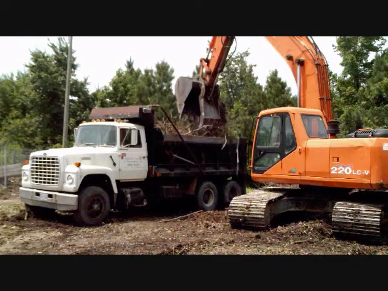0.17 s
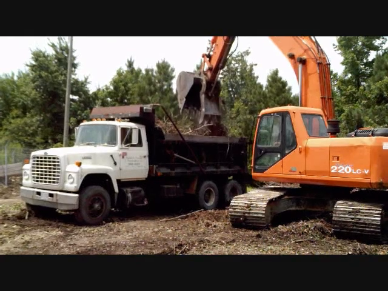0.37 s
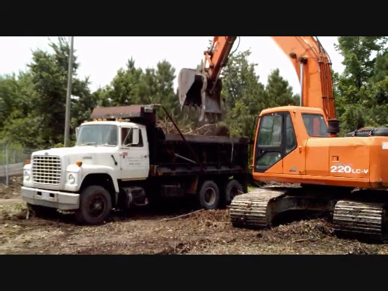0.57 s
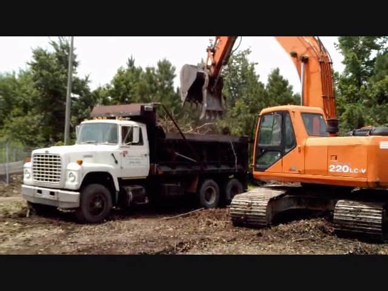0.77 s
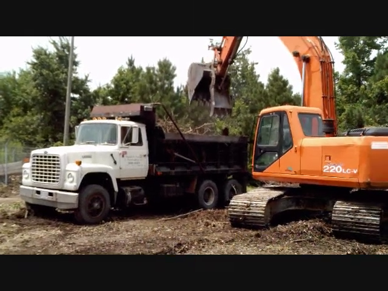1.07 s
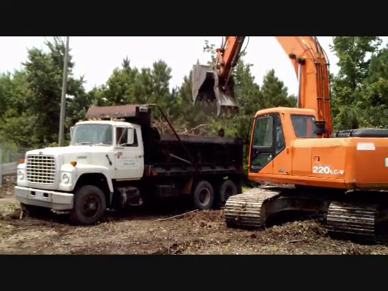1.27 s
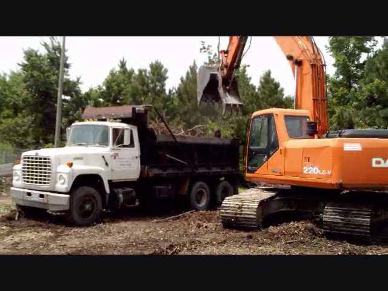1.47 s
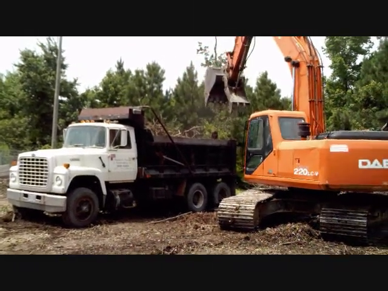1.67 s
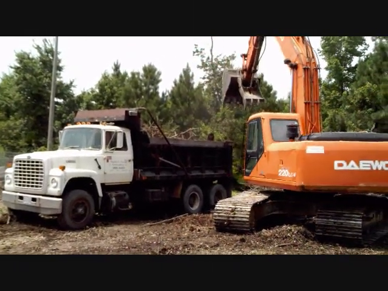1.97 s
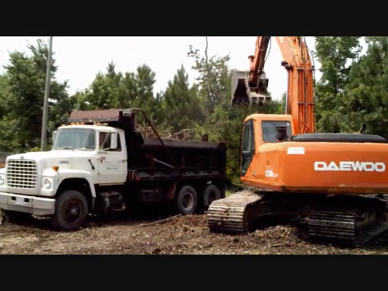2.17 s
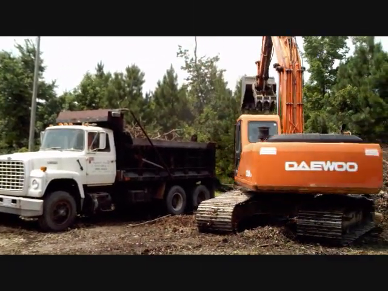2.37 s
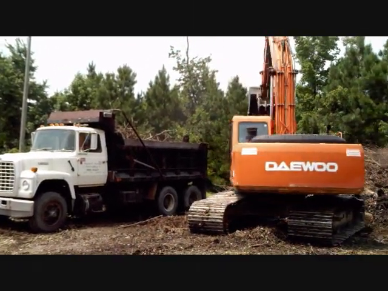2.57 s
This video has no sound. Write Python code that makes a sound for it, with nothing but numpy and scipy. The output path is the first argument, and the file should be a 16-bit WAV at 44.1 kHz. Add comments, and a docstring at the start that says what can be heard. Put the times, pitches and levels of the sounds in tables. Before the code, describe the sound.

An excavator's diesel engine rumbles steadily outdoors with a hydraulic whine. Pins creak and earth thuds into an idling dump truck, then the steel bucket clanks rapidly as it is shaken empty, and the machine whines as it swings away.

```python
"""Outdoors, an excavator's diesel runs at working speed beside an idling dump truck; the pump whines.
Dry pins creak, and earth and sticks fall in the truck bed.
From 0.5 s the steel bucket clanks as it is shaken empty.
From 1.3 s the swing motor's whine rises as the machine swings its tail round.
Near 2.5 s the engine grows louder, a small steel part clinks and the bucket clanks twice more."""
import sys
import numpy as np
from scipy import signal
from scipy.fft import rfft, irfft
from scipy.io import wavfile

SR = 44100
rng = np.random.default_rng(int(sys.argv[2]) if len(sys.argv) > 2 else 0)


def to_wav(s):
    """Save 16-bit WAV."""
    ch = np.atleast_2d(s).T  # columns
    pcm = np.round(np.clip(ch, -1, 1) * 32767)  # PCM
    wavfile.write(sys.argv[1], SR, pcm.astype(np.int16))


N = 120393

# crankshaft speed: time_s, speed_hz
CRANK_SPEED = [(0, 30.55), (.25, 30.4), (.6, 30.25), (1.3, 30.25), (1.52, 30.0), (1.75, 30.15), (2.1, 30.0),
               (2.3, 30.1), (2.73, 30.7)]
# engine tones: crank_order, level_db
ENGINE_ORDERS = [(3, -46.5), (4, -48.5), (5, -42.5), (6, -46.5), (7, -45), (12, -49.5), (18, -48.5),
                 (24, -61)]
# engine tones under load: time_s, gain_db
ENGINE_LOAD = [(1.1, -0.5), (2.0, 1), (2.73, 1)]
# engine noise spectrum: freq_hz, density_db
ROAR_SPECTRUM = [(22, -21), (56, -2.5), (110, 0), (170, -1.5), (270, -0.5), (410, -5.5), (495, -14.5),
                 (580, -9), (830, -4), (980, -11), (1400, -13), (1750, -36), (4800, -46), (6200, -41.5),
                 (7800, -49)]
# engine noise bands: time_s, bass_db, middle_db, treble_db
ROAR_LEVELS = [(0, -36.5, -35.5, -44), (.42, -35.5, -35, -44.5), (1.45, -39, -35.5, -45.5),
               (1.7, -39, -37, -45.5), (2.48, -37, -36, -44.5), (2.58, -32, -30.5, -42),
               (2.73, -35.5, -39.5, -43.5)]
# engine housing resonances: freq_hz, width_hz, level_db
HOUSING_MODES = [(900, 150, -47), (1466, 21, -58.5), (2473, 120, -53.5), (4020, 380, -57)]
# truck idle: pitch_hz, level_db
TRUCK_TONES = [(35, -51), (69.8, -47)]
# pump whine: time_s, piston_db, third_harmonic_db
PUMP_LEVELS = [(0, -54.5, -34.5), (.25, -41, -36.5), (.62, -40, -33.5), (.85, -37, -40),
               (1.8, -55.5, -49.5), (2.02, -57, -37), (2.2, -36.5, -69), (2.49, -36, -65), (2.58, -49, -41)]
# valve whistle: time_s, level_db
VALVE_LEVELS = [(0, -65), (1.25, -53), (1.74, -54), (1.82, -63)]
# swing motor whine: time_s, level_db
SWING_LEVELS = [(1.3, -58), (1.7, -46), (2.1, -46.5), (2.5, -58.5)]
# bucket pin creaks: start_s, level_db, pitch_hz, length_s
PIN_CREAKS = [(0.032, -23, 820, 0.0045), (.066, -22, 693, 0.0075), (.234, -25.5, 844, 0.015),
              (0.461, -27, 726, 0.029), (0.6567, -10.5, 740, 0.0035), (0.662, -13.5, 677.7, 0.025),
              (0.693, -17, 667, 0.013)]
# earth landing: start_s, level_db, pitch_hz
CLOD_FALLS = [(0.074, -22, 161), (.255, -27, 195), (0.309, -29.5, 49.8), (.765, -26, 86.2),
              (1.485, -30.5, 350)]
# debris snaps: start_s, level_db, t60_s
DEBRIS_SNAPS = [(0.233, -38, 0.052), (0.506, -32.5, 0.066), (1.214, -43, .14), (1.2686, -40, 0.074),
                (2.177, -35, 0.016), (2.548, -41, 0.12)]
# snap spectrum: freq_hz, density_db
SNAP_SPECTRUM = [(300, 2.5), (1400, -13), (2600, 6), (3400, -4), (4300, 2.5), (5000, -15), (6200, 4.5),
                 (8000, -11.5)]
# bucket blows: start_s, thud_db, clang_db, crack_db, t60_s
BUCKET_BLOWS = [(.504, -29, -21, -35, .1), (.7215, -27.5, -18.5, -27.5, 0.29),
                (.7487, -19, -23.5, -30.5, 0.34), (.772, -20.5, -25, -40.5, 0.18),
                (.802, -30, -27.5, -38, 0.54), (.886, -23.5, -26, -56, 0.22),
                (.935, -27, -25.5, -38.5, 0.62), (1.0075, -18.5, -18, -29.5, 0.28),
                (1.046, -27.5, -25, -49, 0.59), (1.098, -25, -22.5, -36.5, 0.9),
                (1.127, -18.5, -22, -31, 0.35), (1.1455, -18.5, -19, -25, 0.11),
                (1.172, -27.5, -26.5, -34.5, 0.37), (1.212, -26.5, -35, -37.5, 0.94),
                (1.272, -29, -23.5, -41.5, 0.18), (1.4446, -35, -32, -36, 0.16),
                (2.562, -38, -25.5, -45, 0.11), (2.68, -26, -32.5, -43, 0.62)]
# bucket's dense ring: freq_hz, density_db
BUCKET_SPECTRUM = [(40, -26), (130, -7), (240, 0.5), (360, 1.5), (470, -6), (570, 0.5), (720, 1.5),
                   (1020, -9.5), (1400, -9), (1660, -20.5), (2030, -25.5), (2350, -17.5), (2990, -30),
                   (4230, -27), (4750, -38), (6100, -33.5), (7800, -44)]
# bucket's clear modes: freq_hz, gain_db, t60_s
BUCKET_MODES = [(243, -20, .6), (338, -17.5, 0.5), (529, -17, .42), (612, -11.5, 0.6), (683, -9, 0.5),
                (812, -18, 0.5), (1335, -16.5, 0.5), (1437, -17, .25), (1814, -16, 0.25), (1921, -15, 0.2),
                (2261, -19.5, 0.3), (2480, -19, .35), (3256, -23.5, 0.5), (4250, -18.5, 0.19)]
# small steel part: freq_hz, level_db
CLINK_MODES = [(4247, -41), (6008, -47)]


def amp(db):
    return 10 ** (np.asarray(db) / 20)


def unit(x):
    """Scale to rms 1."""
    return x / np.sqrt(np.mean(x ** 2) + 1e-20)


def rise(t, tau_s):
    return 1 - np.exp(-t / tau_s)


def decay(t, t60_s):
    return amp(-60 * t / t60_s)


def curve(table, column=1):
    """Table column, linearly interpolated in time."""
    rows = np.array(table)
    return np.interp(np.arange(N) / SR, rows[:, 0], rows[:, column])


def add(mix, start_s, sound):
    part = mix[max(round(start_s * SR), 0):][:len(sound)]
    part += sound[:len(part)]


def noise(gain):
    """Noise of rms 1 with spectrum gain(freq_hz)."""
    size = 2 ** 17
    white = rfft(rng.standard_normal(size))
    return unit(irfft(white * gain(np.fft.rfftfreq(size, 1 / SR)))[:N])


def drift(rate_hz):
    """Smooth random wander, rms 1."""
    return noise(lambda f: np.exp(-(f / rate_hz) ** 2))


def colour(spectrum, f):
    """Spectrum table's gain, interpolated in log frequency."""
    hz, db = np.transpose(spectrum)
    return amp(np.interp(np.log(f + 1), np.log(hz + 1), db))


def three_bands(spectrum, low_hz, high_hz):
    """Bass, middle and treble of a coloured noise, each rms 1."""
    def below(f, hz):
        return 1 / (1 + (f / hz) ** 12)
    shares = [lambda f: below(f, low_hz),
              lambda f: (1 - below(f, low_hz)) * below(f, high_hz),
              lambda f: 1 - below(f, high_hz)]
    return [noise(lambda f: colour(spectrum, f) * np.sqrt(share(f))) for share in shares]


def resonance(hz, width_hz):
    """Noise ringing in one resonance."""
    return noise(lambda f: 1 / (1 + ((f - hz) / width_hz) ** 2))


def tone(cycles, waver_db=0.5):
    """Sine of rms 1, level wavering."""
    return unit(amp(waver_db * drift(rate_hz=8)) * np.sin(2 * np.pi * (cycles + rng.random())))


def engine(turns, firings_per_turn=3):
    """Diesel: crankshaft orders, bass roar, and combustion clatter throbbing at the firing rate."""
    tones = amp(curve(ENGINE_LOAD)) * sum(amp(db) * tone(order * turns) for order, db in ENGINE_ORDERS)
    throb = unit(1 + 0.1 * np.cos(2 * np.pi * firings_per_turn * turns))
    flicker = amp(0.61 * drift(rate_hz=25.1))
    bands = three_bands(ROAR_SPECTRUM, low_hz=470, high_hz=1750)
    bass, middle, treble = [band * amp(curve(ROAR_LEVELS, i)) for i, band in enumerate(bands, 1)]
    housing = sum(amp(db) * resonance(hz, width_hz) for hz, width_hz, db in HOUSING_MODES)
    return tones + bass + throb * flicker * (middle + treble + housing)


def truck():
    """Low firing tones at idle."""
    return sum(amp(db) * tone(hz * np.arange(N) / SR) for hz, db in TRUCK_TONES)


def hydraulics(turns, pistons=9, swing_order=15, valve_hz=3292, wander_hz=22):
    """Pump and swing motor whine with the crankshaft; oil whistles through a valve."""
    pump = amp(curve(PUMP_LEVELS, 1)) * tone(pistons * turns)
    pump += amp(curve(PUMP_LEVELS, 2)) * tone(3 * pistons * turns)
    swing = amp(curve(SWING_LEVELS)) * tone(swing_order * turns)
    whistle_hz = valve_hz + wander_hz * drift(rate_hz=66)
    whistle = amp(curve(VALVE_LEVELS)) * tone(np.cumsum(whistle_hz) / SR)
    return pump + swing + whistle


def creaks(overtone_ratio=2.15, rough_db=1.6):
    """Dry pins stick and slip: each rough, hollow creak swells, holds and stops."""
    t, out = np.arange(SR // 4) / SR, np.zeros(N)
    for start_s, db, hz, length_s in PIN_CREAKS:
        phase = 2 * np.pi * hz * t
        ring = np.sin(phase) + amp(-21) * np.sin(overtone_ratio * phase)
        rough = amp(rough_db * drift(rate_hz=200)[:len(t)])
        grit = amp(-14) * resonance(hz, width_hz=240)[:len(t)]
        release = decay(np.maximum(t - length_s, 0), t60_s=0.01)
        add(out, start_s, amp(db) * (rough * ring + grit) * rise(t, 0.27 * length_s) * release)
    return out


def clods():
    """Soft earth lands in the truck bed with dull booms."""
    t, out = np.arange(SR // 2) / SR, np.zeros(N)
    envelope = rise(t, tau_s=0.0081) * decay(t, t60_s=0.29)
    for start_s, db, hz in CLOD_FALLS:
        boom = envelope * resonance(hz, width_hz=0.25 * hz)[:len(t)]
        add(out, start_s, amp(db) * boom * np.linalg.norm(envelope) / np.linalg.norm(boom))
    return out


def debris():
    """Sticks and stones: short, bright, grainy snaps."""
    t, envelope = np.arange(SR // 4) / SR, np.zeros(N)
    for start_s, db, t60_s in DEBRIS_SNAPS:
        add(envelope, start_s, amp(db) * decay(t, t60_s))
    hiss = noise(lambda f: colour(SNAP_SPECTRUM, f))
    grain = unit(np.exp(0.41 * drift(rate_hz=480)))
    return envelope * hiss * grain


def bucket(crack_edge_hz=1480, bright_ring_db=7.5):
    """Each blow thuds, clangs, cracks and rings the steel's modes, which shift as the load moves."""
    t = np.arange(SR) / SR
    ring, thud_power, clang_power, crack_power = np.zeros((4, N))
    slow, fast = rise(t, tau_s=0.011), rise(t, tau_s=0.0012)
    for start_s, thud_db, clang_db, crack_db, t60_s in BUCKET_BLOWS:
        fade = decay(t, t60_s)
        add(thud_power, start_s, (amp(thud_db) * slow * fade) ** 2)
        add(clang_power, start_s, (amp(clang_db) * fast * fade) ** 2)
        add(crack_power, start_s, (amp(crack_db) * fast * fade) ** 2)
        detunes = 1 + 0.009 * rng.standard_normal(len(BUCKET_MODES))
        for (hz, gain_db, mode_t60_s), detune in zip(BUCKET_MODES, detunes):
            drive_db = clang_db if hz < crack_edge_hz else crack_db + bright_ring_db
            mode = np.sin(2 * np.pi * (hz * detune * t + rng.random()))
            add(ring, start_s, amp(drive_db + gain_db) * fast * decay(t, mode_t60_s) * mode)
    bands = three_bands(BUCKET_SPECTRUM, low_hz=407, high_hz=crack_edge_hz)
    thud, clang, crack = np.sqrt([thud_power, clang_power, crack_power]) * bands
    chatter = unit(np.exp(0.17 * drift(rate_hz=250)))
    return ring + thud + chatter * (clang + crack)


def clink(start_s=2.546):
    """A small loose steel part rings in two high, buzzing resonances."""
    t, out = np.arange(SR // 4) / SR, np.zeros(N)
    ring = sum(amp(db) * resonance(hz, width_hz=170)[:len(t)] for hz, db in CLINK_MODES)
    add(out, start_s, ring * decay(t, t60_s=0.1))
    return out


def scene():
    """Mono mix; one crankshaft drives engine and hydraulics."""
    crank_hz = curve(CRANK_SPEED) * (1 + 0.0008 * drift(rate_hz=19))
    turns = np.cumsum(crank_hz) / SR
    machines = engine(turns) + truck() + hydraulics(turns)
    return (machines + creaks() + clods() + debris() + bucket() + clink())[None]


def record(dry, ceiling=0.45, cutoff_hz=7950, dc_offset=0.0759):
    """Soft clip, low-pass, constant offset."""
    rounded = dry / (1 + (dry / ceiling) ** 4) ** 0.25
    lowpass = signal.firwin(401, cutoff_hz, window=("kaiser", 9), fs=SR)
    return dc_offset + signal.oaconvolve(rounded, lowpass[None], "same")


dry = scene()
out = record(dry)
to_wav(out)
```